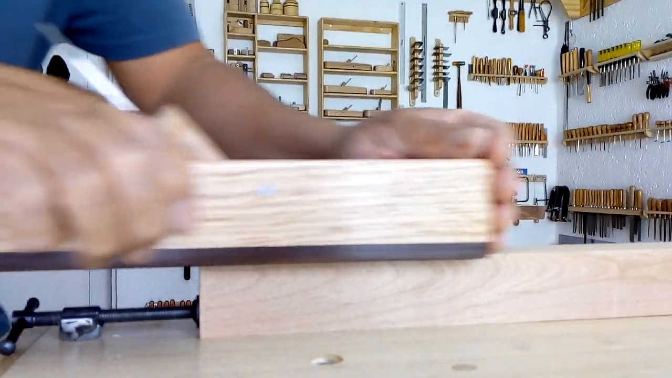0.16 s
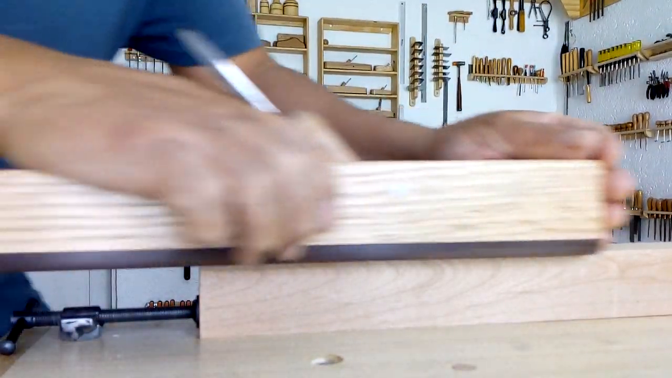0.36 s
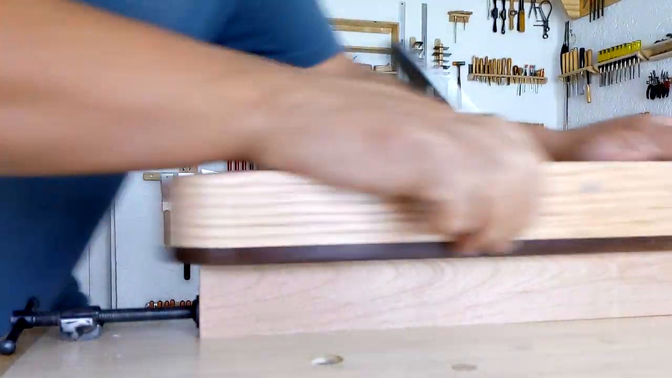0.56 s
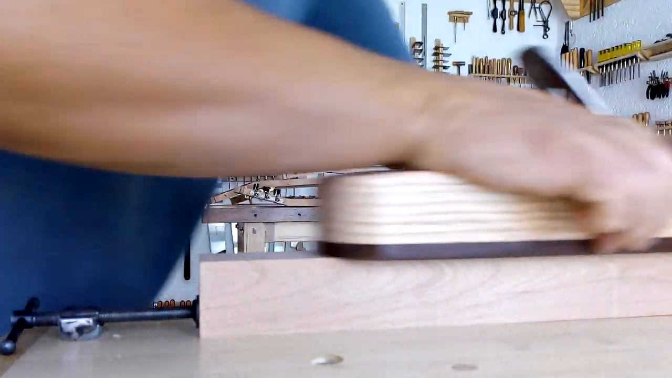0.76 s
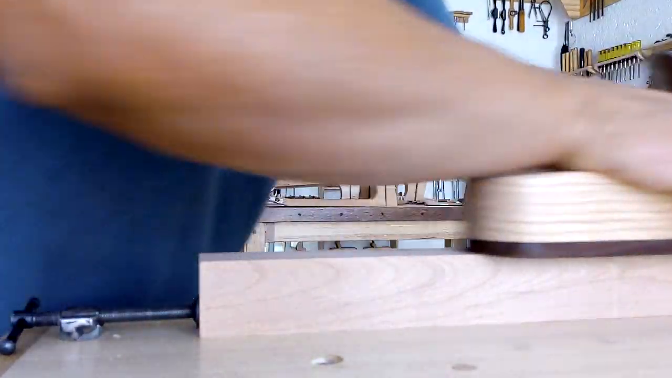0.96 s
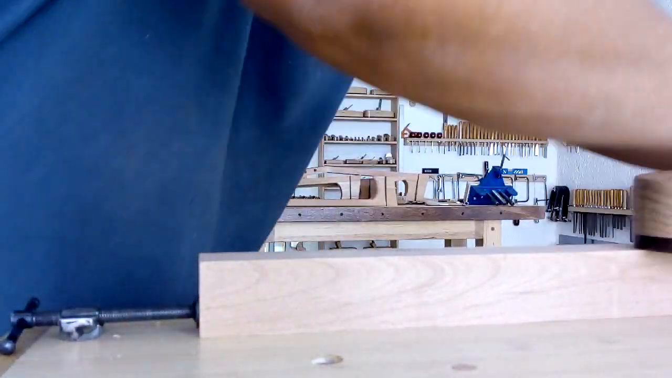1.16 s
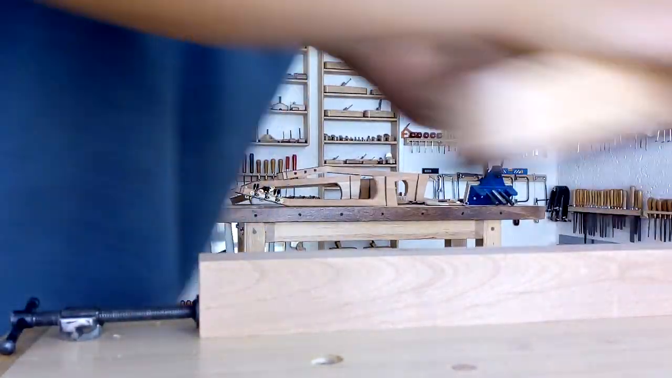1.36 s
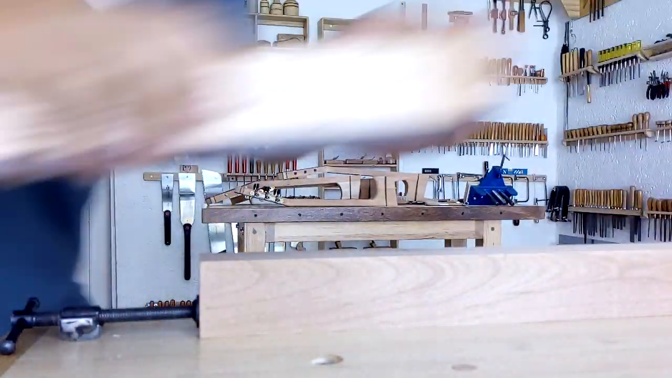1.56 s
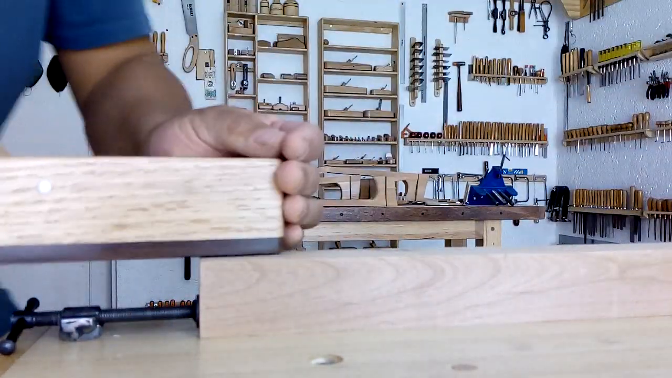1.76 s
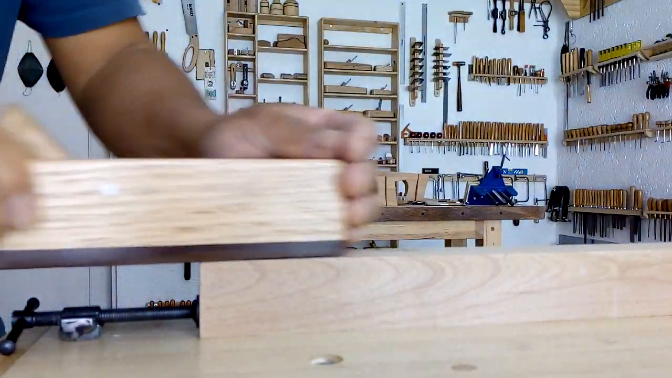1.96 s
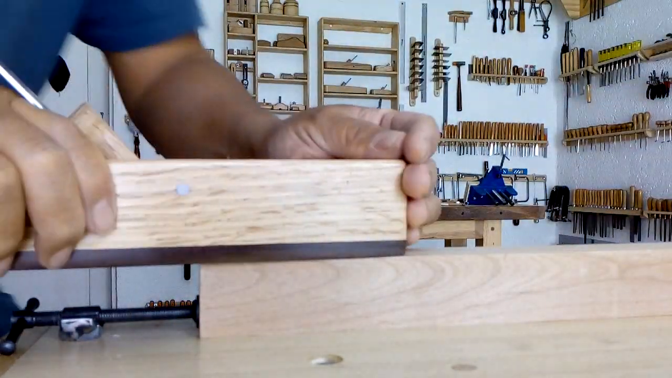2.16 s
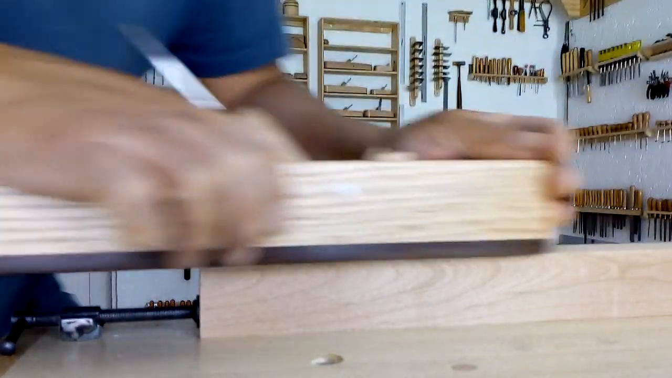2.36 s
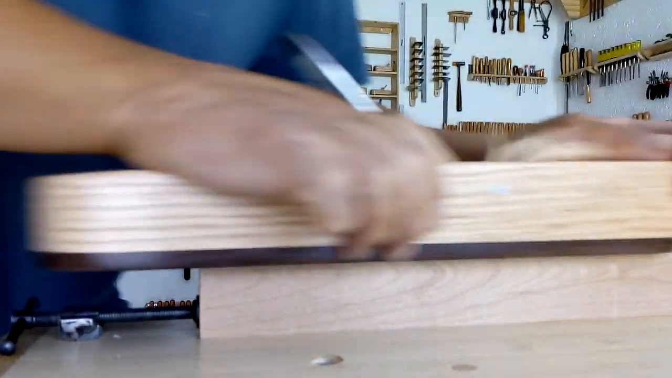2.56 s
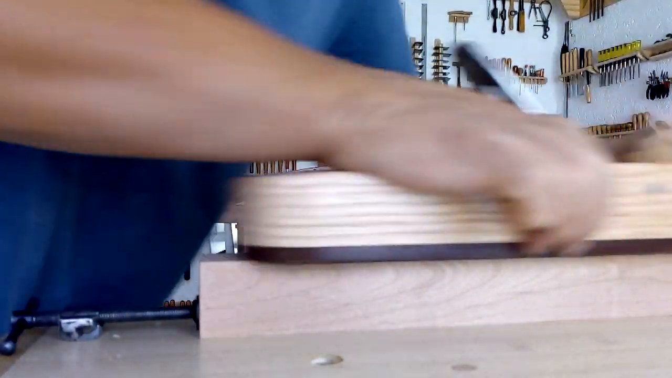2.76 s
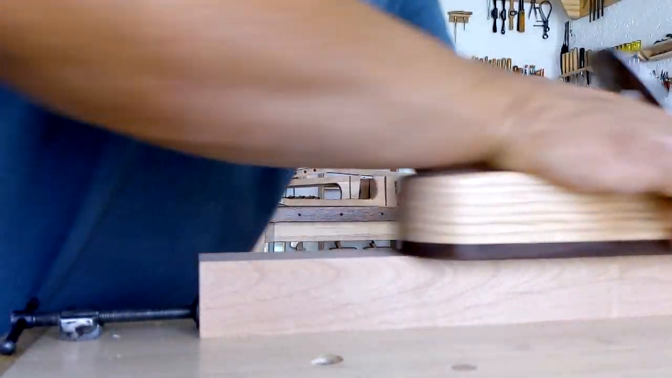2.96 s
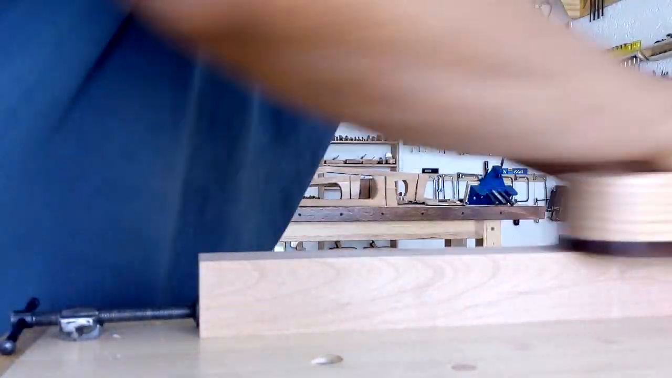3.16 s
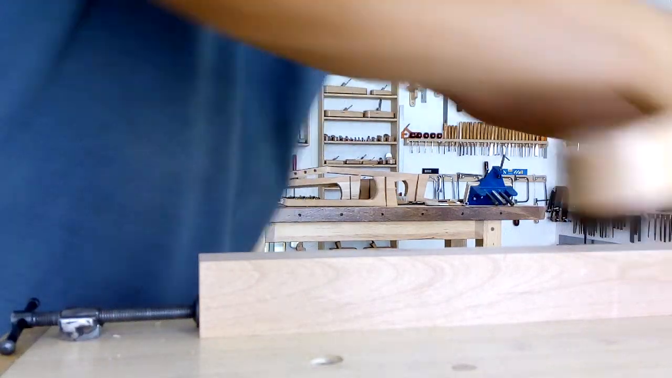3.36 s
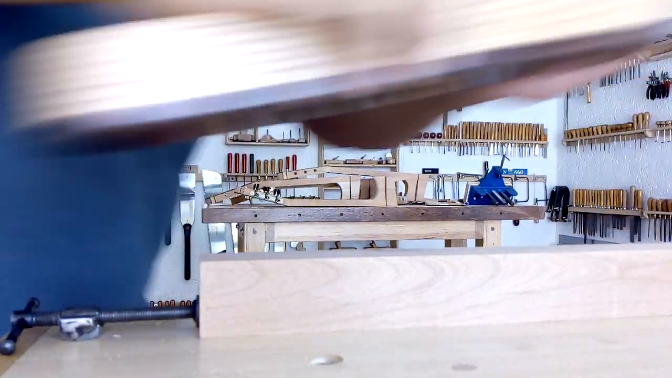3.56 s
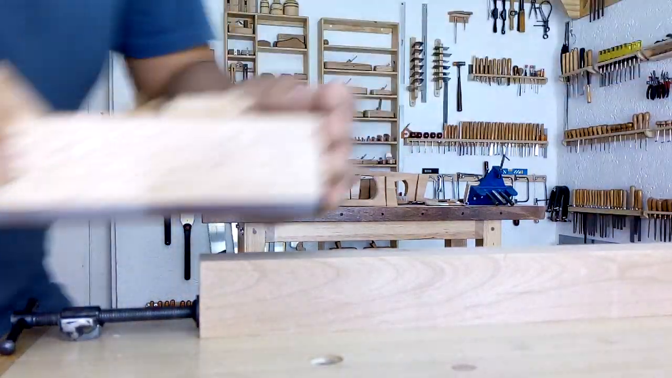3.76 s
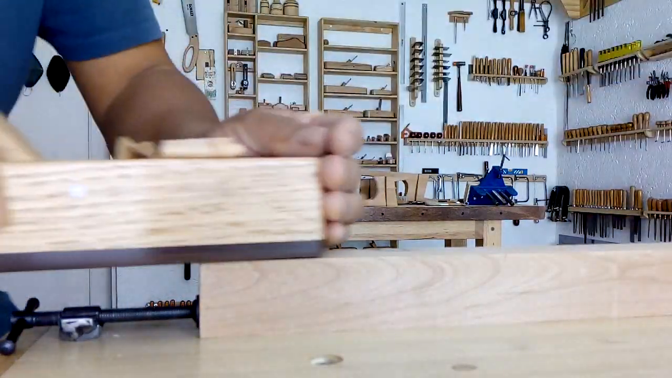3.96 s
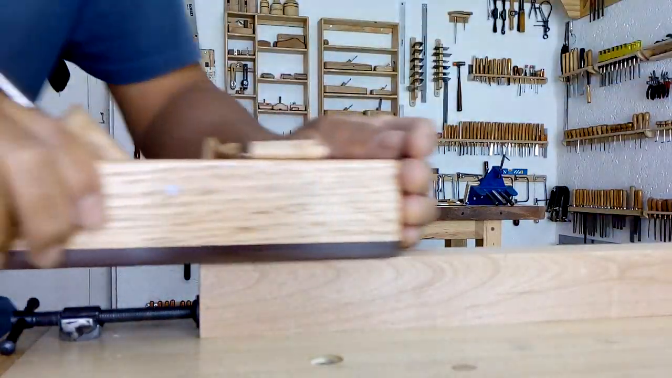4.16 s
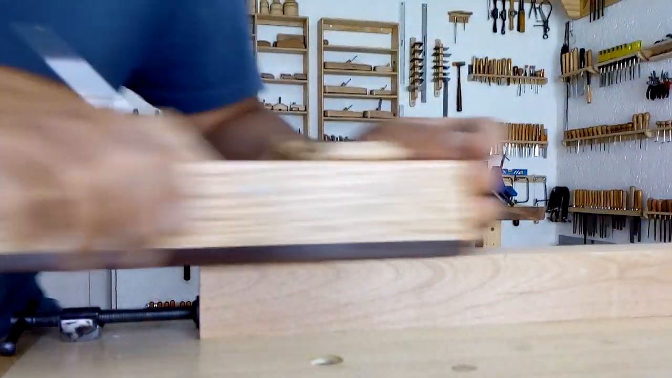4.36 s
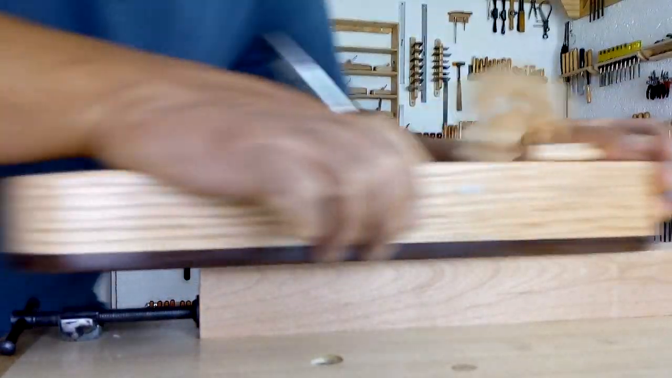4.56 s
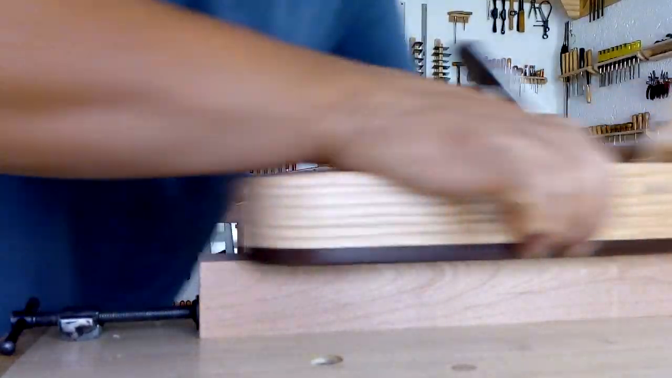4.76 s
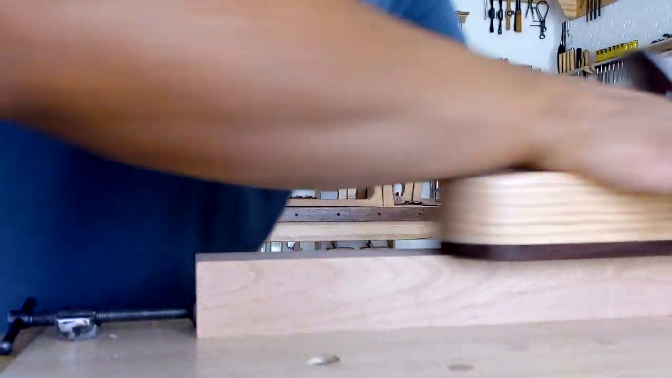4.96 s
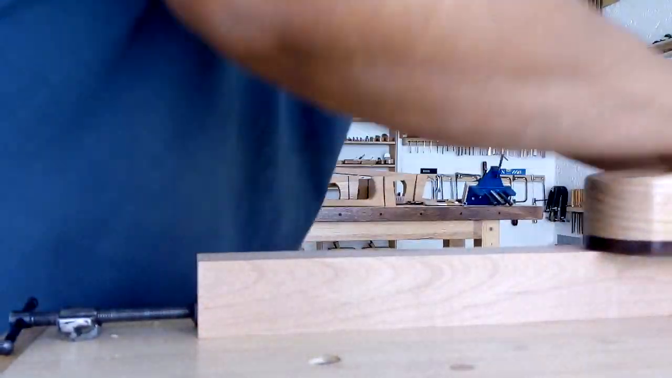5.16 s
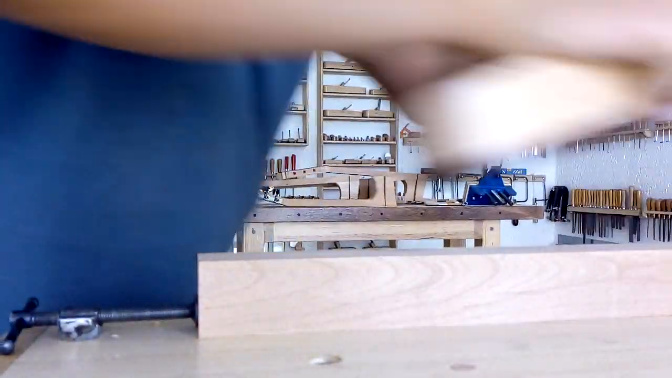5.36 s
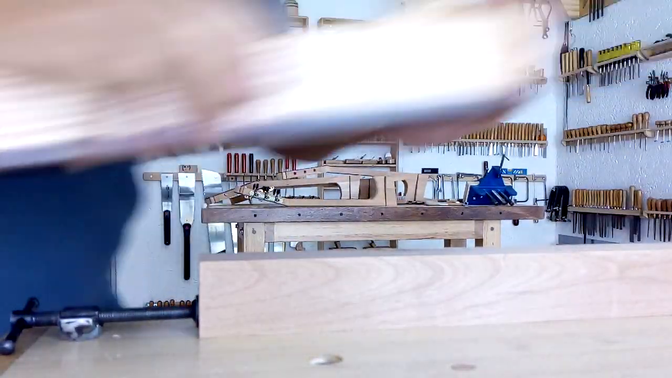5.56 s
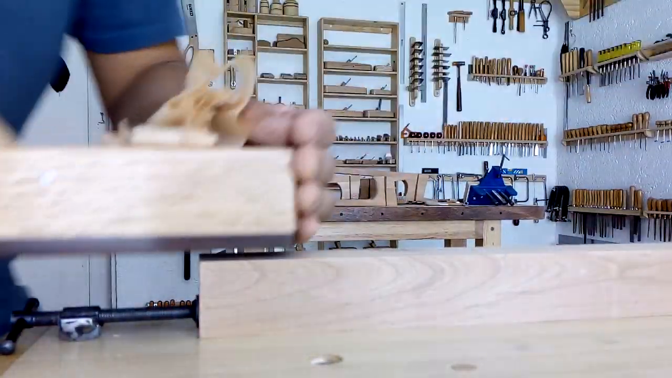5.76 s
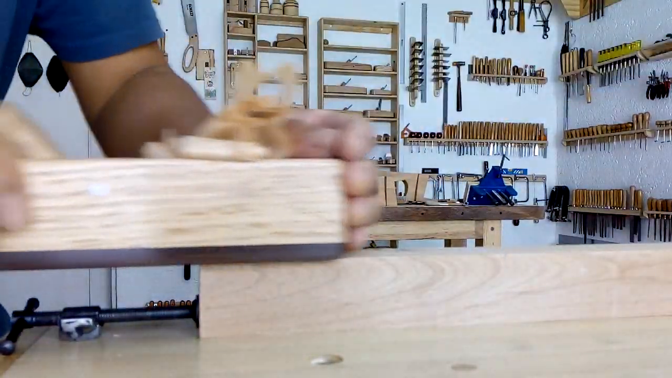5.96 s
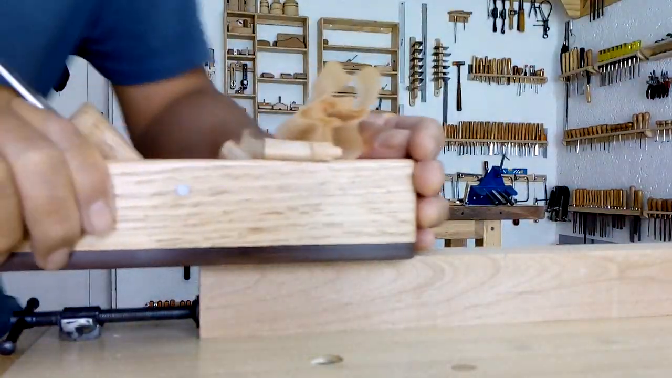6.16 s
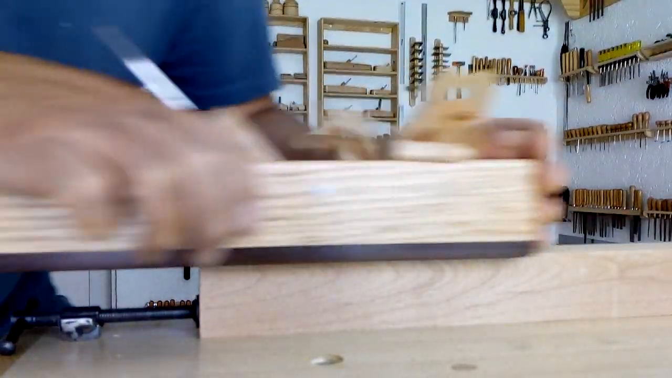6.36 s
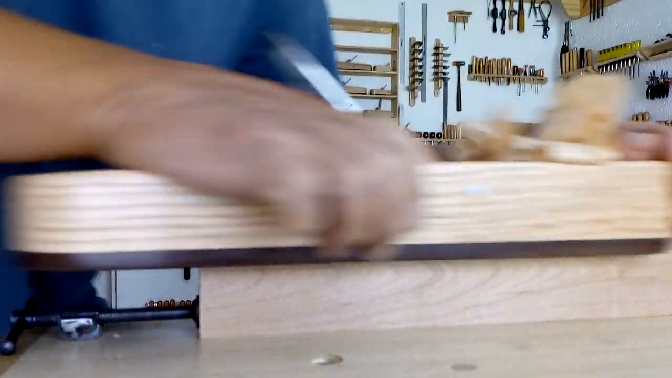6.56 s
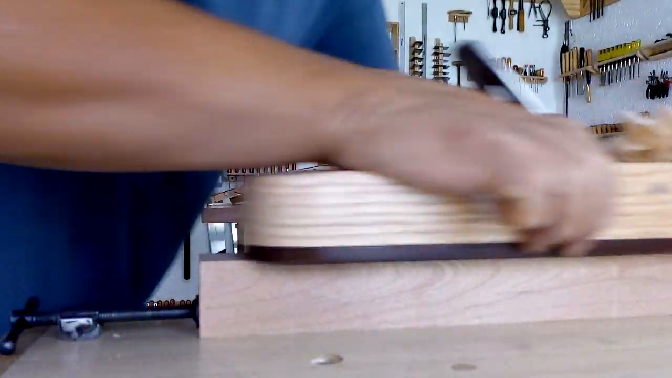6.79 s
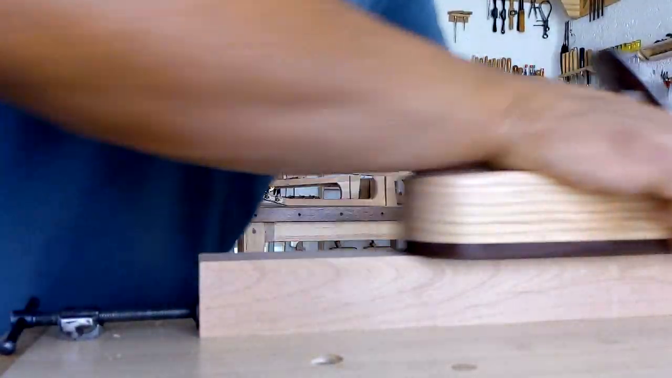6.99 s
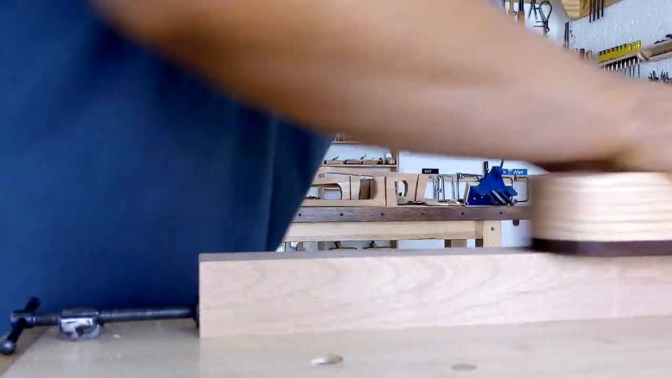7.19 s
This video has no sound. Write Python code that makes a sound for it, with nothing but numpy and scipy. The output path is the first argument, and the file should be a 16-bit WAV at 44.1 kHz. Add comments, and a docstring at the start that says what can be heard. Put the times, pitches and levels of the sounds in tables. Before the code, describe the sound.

A wooden hand plane is heard up close in a small workshop, louder on the right. It starts cutting at once, a grainy, hissing rasp with a wavering whistle, and ends with a knock at about 1 second. A faint low drone lingers briefly. At 1.8 seconds the plane is set down with a hollow, rocking knock, slides with faint squeaks and catches the board with a tick. The second stroke runs from 2.2 to 3.1 seconds. The plane knocks down again near 4 seconds, bites, and shaves from 4.3 to 5.1 seconds. After a short pause it lands at about 5.9 seconds, catches with a sharp crunch, and makes a last whistling stroke from 6.2 to 7.2 seconds. The workbench rumbles and shudders softly under each cut, and a faint low hum and quiet room air fill the gaps.

```python
"""A small workshop: a long wooden hand plane takes four shavings off the edge of a board clamped to a bench.
Between strokes it is set down with a hollow knock, rocks, and slides until the iron catches the board.
The cut is a stream of tiny fibre fractures that ring in the plane, hiss in the shaving and rub under
the sole. Beneath it lie the shuddering bench, a faint hum and the air of the room.
A close pair of microphones hears it, louder on the right."""
import sys
import numpy as np
from scipy import signal
from scipy.fft import rfft, irfft
from scipy.io import wavfile
from scipy.ndimage import uniform_filter1d

SR = 44100
rng = np.random.default_rng(int(sys.argv[2]) if len(sys.argv) > 2 else 0)


def output_pcm(signal):
    """Save a mono or channel-first signal as 16-bit PCM at the path in sys.argv[1].

    Samples are clipped to [-1, 1] before scaling.
    """
    pcm = np.clip(np.atleast_2d(signal).T, -1, 1) * 32767
    wavfile.write(sys.argv[1], SR, np.round(pcm).astype(np.int16))


N = 318843
TIME, FREQS = np.arange(N) / SR, np.fft.rfftfreq(N, 1 / SR)


def gain(db):
    """Decibels to gain."""
    return 10 ** (np.asarray(db) / 20)


def unit_rms(x):
    """Scales to rms 1."""
    return x / np.sqrt(np.mean(x ** 2) + 1e-20)


def curve_at(points, hz):
    """Reads a curve on a log-frequency axis."""
    freqs, values = np.transpose(points)
    return np.interp(np.log(hz + 1), np.log(freqs + 1), values)


def add(mix, start_s, sound):
    """Drops a sound into the mix."""
    part = mix[max(round(start_s * SR), 0):][:len(sound)]
    part += sound[:len(part)]


def envelope(cues, attack_s, release_s):
    """Gain over time for cues that rise, hold for their length and die away."""
    return sum(gain(db) * np.clip((TIME - start) / attack_s, 0, 1)
               * np.exp(-np.maximum(TIME - start - length, 0) / release_s) for start, length, db in cues)


def wander(rate_hz):
    """Smooth random modulation of rms 1, up to a rate."""
    return unit_rms(irfft(rfft(rng.standard_normal(N)) / (1 + (FREQS / rate_hz) ** 4), N))


def colour(x, spectrum, peaks=()):
    """Causal EQ of unit energy: a broad spectrum with resonances on top."""
    hz = np.fft.rfftfreq(8192, 1 / SR)
    db = curve_at(spectrum, hz) + sum(rise / (1 + (2 * (hz - f) / width) ** 2) for f, width, rise in peaks)
    log_gain = np.log(gain(np.r_[db, db[-2:0:-1]]))
    taps = np.fft.ifft(np.exp(signal.hilbert(log_gain).conj())).real[:len(hz)]  # minimum phase
    return signal.oaconvolve(x, taps / np.linalg.norm(taps))[:N]


def noise(spectrum):
    """Coloured noise of rms 1."""
    return unit_rms(colour(rng.standard_normal(N), spectrum))


def resonate(x, hz, width_hz, stages=2):
    """Resonators in series that follow the pitch curve hz; the result has rms 1."""
    turn, pole = np.exp(2j * np.pi * np.cumsum(hz) / SR), np.exp(-np.pi * width_hz / SR)
    for _ in range(stages):
        x = 2 * (turn * signal.lfilter([1 - pole], [1, -pole], x / turn)).real
    return unit_rms(x)


def patchy(x, depth_db, bins=7):
    """Shifts the colour in patches about a kilohertz wide and some hundredths of a second long."""
    spectra = signal.stft(x, SR, nperseg=256)[2]
    patches = rng.standard_normal(spectra.shape)
    for _ in range(2):
        patches = uniform_filter1d(uniform_filter1d(patches, bins, axis=0), 2 * bins, axis=1)
    return signal.istft(spectra * gain(depth_db * unit_rms(patches)), SR, nperseg=256)[1][:N]


def crackle(per_s, spread_db):
    """Impulses of uneven size at random moments: fibres snapping or wood slipping."""
    size = gain(spread_db * np.minimum(rng.exponential(1, N), 5))
    return unit_rms(size * rng.choice([-1, 1], N) * (rng.random(N) < per_s / SR))


# How alike the room sounds left and right: freq_hz, correlation
ROOM_LIKENESS = [(100, 0.91), (350, 0.9), (700, 0.46), (1300, 0), (15000, 0.25)]
def diffuse(pair):
    """Makes two unrelated signals alike in the bass, as a room is at two close microphones."""
    shared, separate = rfft(pair)
    likeness = np.clip(curve_at(ROOM_LIKENESS, np.fft.rfftfreq(pair.shape[1], 1 / SR)), -1, 1)
    left = likeness * shared + np.sqrt(1 - likeness ** 2) * separate
    return irfft(np.array([left, shared]), pair.shape[1])


# Decay of the room tail: freq_hz, t60_s
ROOM_DECAY = [(100, 0.47), (350, 0.53), (1000, 0.5), (2200, 0.43), (5000, 0.4), (9000, 0.17), (15000, 0.24)]
# Tone of the room tail: freq_hz, level_db
ROOM_EQ = [(100, 3), (280, -2), (450, 1), (1000, 1.5), (3000, 0), (15000, -1)]
def echoes(early_db, tail_db, early_t60_s=0.016, build_cycles=3.9):
    """Quick echoes off bench and body, then the room tail, for one position of the plane."""
    t = np.arange(SR) / SR
    taps = diffuse(rng.choice([-1., 1.], (2, SR)) * (rng.random((2, SR)) < 4000 / SR))
    early = taps[:, ::-1] * (t > .002) * gain(-60 * t / early_t60_s)
    hz, age, spectra = signal.stft(taps * (t > .009), SR, nperseg=256)
    build = 1 - np.exp(-(age * np.maximum(hz, 100)[:, None] / build_cycles) ** 2)  # the bass blooms late
    decay = gain(curve_at(ROOM_EQ, hz)[:, None] - 60 * age / curve_at(ROOM_DECAY, hz)[:, None])
    tail = signal.istft(spectra * build * decay, SR, nperseg=256)[1][:, :SR]
    return gain(early_db) * early / np.linalg.norm(early[1]) + gain(tail_db) * tail / np.linalg.norm(tail[1])


# Phase between the microphones: freq_hz, left_lead_rad
MIC_PHASE = [(100, 1), (1700, 1.03), (2150, -2), (2650, -2.5), (3000, 2.5), (3700, 3.5), (4500, -3),
             (6800, -2), (9000, 3), (16000, 1.5)]
def workshop(x, early_db, tail_db, turns_per_s=2.3):
    """Direct sound at both microphones, plus two echo patterns that crossfade as the plane travels."""
    left = irfft(rfft(x) * np.exp(1j * curve_at(MIC_PHASE, FREQS)), N)
    angle = 2 * np.pi * turns_per_s * TIME
    room = sum(signal.fftconvolve((x * share)[None], echoes(early_db, tail_db), axes=1)[:, :N]
               for share in (np.cos(angle), np.sin(angle)))
    return np.array([left, x]) + room


# Room tone: freq_hz, level_db
AIR_EQ = [(15, -47), (25, -21), (104, -14.5), (173, -25.5), (349, -17.5), (410, -27), (552, -23.5),
          (895, -29.5), (1080, -29.5), (1200, -29.5), (1660, -31.5), (1950, -27.5), (2770, -34.5),
          (15500, -58)]
# Fader ride on its hiss: time_s, level_db
AIR_SWELL = [(1.6, -9), (2.3, 0), (3.6, -2), (5.5, -5.5), (7.2, 3.5)]
def air(level_db=-59, crossover_hz=300):
    """Steady room rumble under a faint hiss that swells and sinks."""
    bed = diffuse(np.array([noise(AIR_EQ), noise(AIR_EQ)]))
    rumble = signal.sosfiltfilt(signal.butter(2, crossover_hz, fs=SR, output="sos"), bed)
    hiss = (bed - rumble) * gain(np.interp(TIME, *np.transpose(AIR_SWELL)))
    return gain(level_db) * (rumble + hiss)


# Fader ride on the hum: time_s, level_db
HUM_LEVEL = [(0.3, -69.5), (1.7, -69), (2.3, -68), (4.0, -61.5), (6.0, -61.5), (7.2, -61)]
def hum(pitch_hz=104, waver=0.0327, flutter_db=3):
    """One low tone that wavers in level and pitch."""
    flutter = gain(flutter_db * wander(4.7))
    tone = np.sin(2 * np.pi * pitch_hz * np.cumsum(1 + waver * wander(11)) / SR)
    return gain(np.interp(TIME, *np.transpose(HUM_LEVEL))) * unit_rms(flutter * tone)


# Drone cues: start_s, length_s, level_db
DRONE_CUES = [(0.0, 0.048, -47), (1.12, 0.37, -53)]
# Its partials: pitch_hz, level_db
DRONE_PARTIALS = [(150, 5.5), (204, -2.5), (250, -4), (303, -6.5), (346, -6.5)]
def drone(waver=0.0094, flutter_db=2):
    """A low drone of unsteady partials comes and goes around the first stroke."""
    chord = sum(gain(db + flutter_db * wander(31))
                * np.sin(2 * np.pi * hz * np.cumsum(1 + waver * wander(15)) / SR)
                for hz, db in DRONE_PARTIALS)
    return envelope(DRONE_CUES, attack_s=0.0079, release_s=0.13) * unit_rms(chord)


# Rustle cue: start_s, length_s, level_db
RUSTLE_CUES = [(1.6, 0.16, -62.5)]
# Its muffled tone: freq_hz, level_db
RUSTLE_EQ = [(120, -19), (320, 11.5), (800, -7), (1600, -27), (6000, -46.5)]
def rustle():
    """A faint rustle as the plane is carried back."""
    return envelope(RUSTLE_CUES, attack_s=0.04, release_s=0.04) * noise(RUSTLE_EQ)


# Shudders of the bench: start_s, length_s, level_db
SHUDDER_CUES = [(1.03, 0.04, -43), (2.5, 0.13, -40.5), (3.15, 0.054, -43), (4.22, 0.17, -35),
                (4.54, 0.28, -40.5), (5.08, 0.056, -33.5), (6.17, 0.09, -38), (6.52, 0.22, -45)]
# Its boomy low end: freq_hz, level_db
BENCH_EQ = [(40, 0), (82, -14), (105, 27.5), (128, -12), (152, 24.5), (185, -10.5), (235, 17.5),
            (350, -44.5)]
def bench(push_db=-63, trim_db=-10.5):
    """The bench rumbles under each stroke and shudders when the push changes."""
    pushes = [(path[0][0], path[-1][0] - path[0][0], push_db) for path in STROKE_PATHS]
    return gain(trim_db) * envelope(SHUDDER_CUES + pushes, attack_s=0.019, release_s=0.05) * noise(BENCH_EQ)


# Light slides before the iron bites: start_s, length_s, level_db
GLIDE_CUES = [(1.89, 0.046, -65), (1.985, 0.11, -60.5), (4.1, 0.14, -68), (5.99, 0.055, -72)]
# Squeaks of the sole: start_s, length_s, level_db
SQUEAK_CUES = [(1.795, 0.012, -61.5), (1.9, 0.047, -58), (2.0, 0.11, -63), (6.0, 0.06, -71)]
# Resonances they ring: pitch_hz, width_hz, level_db
SOLE_MODES = [(2420, 140, 4.5), (3520, 140, -1), (4920, 180, -8), (5830, 160, 1)]
def glide(drift=0.007, drift_hz=10):
    """Smooth wood on wood sticks and slips: thin squeaks in the sole, over a whisper."""
    slips = crackle(per_s=3000, spread_db=-0.5)
    sway = 1 + drift * wander(drift_hz)
    level = envelope(SQUEAK_CUES, attack_s=0.0084, release_s=0.018)
    active, squeaks = level > gain(-100), np.zeros(N)
    squeaks[active] = unit_rms(sum(gain(db) * resonate(slips[active], hz * sway[active], width)
                                   for hz, width, db in SOLE_MODES))
    whisper = unit_rms(colour(slips, [(1000, 10), (2400, 7), (6500, -2.0), (12000, -29)]))
    whisper *= envelope(GLIDE_CUES, attack_s=0.02, release_s=0.022)
    return patchy(level * squeaks + whisper, depth_db=3)


# Thuds of the sole: start_s, level_db, pitch_hz
THUD_HITS = [(1.889, -31, 324), (4.084, -23, 300), (6.0035, -24.5, 329)]
def thuds(trim_db=2, decay_s=0.0016):
    """The sole settles flat under the hand with a damped thud."""
    t, out = np.arange(SR // 2) / SR, np.zeros(N)
    swell = (t / decay_s / 2) ** 2 * np.exp(2 - t / decay_s)
    for start, db, hz in THUD_HITS:
        add(out, start, gain(trim_db + db) * swell * np.sin(2 * np.pi * hz * t))
    return out


# The plane lands, rocks, butts the board or tips; its lowest mode depends on how it rests:
# start_s, level_db, contact_s, low_mode_hz, low_mode_t60_s, click_db
KNOCK_HITS = [(1.055, -20.5, 0.0061, 249.5, 0.25, -70), (1.7885, -35, 0.0017, 272, 0.08, -68),
              (1.7981, -15, 0.001, 278, 0.053, -31.5), (1.809, -21.5, 0.0018, 280, 0.06, -48),
              (1.8174, -26, 0.00089, 264, 0.04, -52), (1.8254, -34, 0.0012, 278, 0.04, -60),
              (3.95, -24, 0.0025, 250, 0.1, -68), (3.9572, -13, 0.0018, 238, 0.35, -35.5),
              (3.9788, -27.5, 0.0026, 238, 0.24, -65), (4.008, -27.5, 0.0041, 241, 0.2, -71),
              (4.026, -26, 0.0054, 236, 0.1, -73), (4.231, -28, 0.0014, 384, 0.24, -55),
              (5.848, -45, 0.0014, 246, 0.1, -78), (5.852, -15.5, 0.0014, 273, 0.16, -38),
              (5.867, -24, 0.0035, 242, 0.15, -72), (5.88, -20, 0.0049, 240, 0.15, -66),
              (5.897, -22, 0.0024, 233, 0.15, -74), (5.946, -31, 0.0023, 247, 0.05, -67),
              (6.148, -41, 0.0012, 380, 0.05, -62), (6.169, -26.5, 0.0011, 385, 0.22, -60)]
# Modes of the plane lying on the board: pitch_hz, level_db, t60_s
BODY_MODES = [(293, 3.5, 0.018), (340.3, -12.5, 0.33), (432, -23, 0.08), (515, -12.5, 0.096),
              (566, -25.5, 0.28), (651, -22, 0.2), (738, -21.5, 0.06), (811.5, -10, 0.083),
              (899, -5.5, 0.052), (953, -15, 0.11), (981, -28, 0.4), (1100, -11.5, 0.071),
              (1225, -3, 0.031), (1450, -6, 0.03), (1740, -16, 0.041), (2387, -10.5, 0.049)]
# Tone of the contact click: freq_hz, level_db
CLICK_EQ = [(300, -3), (1200, 19), (2300, 6.5), (3200, -14), (6000, -5), (9000, -35), (15500, -27)]
def knocks(trim_db=3, low_mode_db=-11, rise_cycles=0.37, click_t60_s=0.016):
    """Wood on wood rings the hollow body; a dry click marks each contact, and thuds join in."""
    t, out, clicks = np.arange(SR // 2) / SR, thuds(), np.zeros(N)

    def mode(hz, db, t60):
        """One mode swells within a cycle and dies away."""
        return gain(db - 60 * t / t60) * (1 - np.exp(-hz * t / rise_cycles)) * np.cos(2 * np.pi * hz * t)

    body = sum(mode(*row) for row in BODY_MODES)
    for start, db, contact_s, low_hz, low_t60, click_db in KNOCK_HITS:
        push = t ** 2 * np.exp(-3 * np.pi * t / contact_s)  # a shorter contact is brighter
        ring = signal.fftconvolve(push / push.sum(), body + mode(low_hz, low_mode_db, low_t60))[:len(t)]
        add(out, start, gain(db + trim_db) * ring)
        add(clicks, start, gain(click_db - 60 * t / click_t60_s))
    out += colour(clicks * rng.standard_normal(N), CLICK_EQ)
    # the knocks carry almost nothing below about 185 Hz
    return signal.sosfilt(signal.butter(3, 185, "highpass", fs=SR, output="sos"), out)


# Peaks and dips of iron, wedge and stock: freq_hz, width_hz, boost_db
PLANE_RESONANCES = [(394, 34, 6.5), (710, 110, 3.5), (889, 53, 5), (1000, 280, 0), (1383, 99, 7),
                    (1662, 158, 13), (2010, 160, -6.5), (2130, 170, 3.5), (2320, 120, 2.5),
                    (2610, 120, 4.5), (2760, 200, -4), (3613, 270, 5.5), (4580, 150, 4), (6120, 320, -2.5)]
def through_plane(x, spectrum):
    """Shapes a sound with a broad EQ and the resonances of the cutting plane."""
    return colour(x, spectrum, PLANE_RESONANCES)


# The iron catches the wood: start_s, level_db, decay_s, tick_db
CATCH_HITS = [(2.135, -38, 0.0077, -30.5), (2.251, -31, 0.013, -59), (4.23, -25, 0.0068, -31),
              (4.405, -31, 0.0035, -51), (4.503, -46, 0.0082, -27), (6.167, -16.5, 0.0059, -26.5),
              (6.846, -40, 0.0022, -36), (6.911, -33, 0.0032, -37.5)]
# Tone of the crunch: freq_hz, level_db
CRUNCH_EQ = [(80, -16), (350, 10), (560, 7), (900, 19), (1700, 10), (2400, 12.5), (2900, -28), (4600, -8),
             (7000, -31), (11000, -37), (15500, -20)]
# Tone of the tick: freq_hz, level_db
TICK_EQ = [(1000, -15), (2300, 2.5), (3500, 2.5), (4600, 0), (5500, -2.5), (8000, -4.5), (12000, -22),
           (15500, -4)]
def catches(crunch_trim_db=-8, tick_trim_db=-6, tick_s=0.00053):
    """A short burst of breaking fibres rings the iron, with a bright tick at the edge."""
    t, bursts, ticks = np.arange(SR // 8) / SR, np.zeros(N), np.zeros(N)
    for start, db, decay_s, tick_db in CATCH_HITS:
        add(bursts, start, gain(db + crunch_trim_db) * np.exp(-t / decay_s))
        add(ticks, start, gain(tick_db + tick_trim_db) * np.exp(-t / tick_s))
    crunch = through_plane(bursts * rng.standard_normal(N), CRUNCH_EQ)
    return crunch + through_plane(ticks * rng.standard_normal(N), TICK_EQ)


# Groans at the bite, whistles at speed: start_s, length_s, from_hz, to_hz, width_hz, level_db
WHISTLE_CUES = [(0.055, 0.26, 2180, 2360, 327, -37.5), (0.757, 0.24, 4160, 4570, 330, -43.5),
                (0.766, 0.14, 2550, 2400, 261, -40), (1.941, 0.054, 2390, 2770, 110, -65),
                (2.245, 0.026, 760, 910, 302, -39), (2.263, 0.085, 2210, 2400, 240, -29.5),
                (2.597, 0.42, 2505, 2650, 240, -38), (4.33, 0.037, 700, 950, 300, -39),
                (4.353, 0.034, 1620, 1730, 160, -41.5), (4.376, 0.05, 2110, 2390, 260, -26.5),
                (4.694, 0.18, 4060, 4300, 400, -48), (6.413, 0.15, 1675, 1775, 150, -40),
                (6.763, 0.098, 3630, 3590, 110, -36), (6.77, 0.31, 2645, 2555, 200, -30.5)]
def whistles(grain_hz=90, grain_db=-2.0):
    """Fractures lock iron or sole into one sharp resonance that swells, glides and fades."""
    fractures = crackle(per_s=9000, spread_db=3.5) * gain(grain_db * wander(grain_hz))
    out = np.zeros(N)
    for start, length, from_hz, to_hz, width, db in WHISTLE_CUES:
        progress = np.arange(0, 1, 1 / (length * SR))
        hz = from_hz + (to_hz - from_hz) * progress
        tone = resonate(fractures[round(start * SR):][:len(hz)], hz, width)
        swell = abs(np.sin(np.pi * progress)) ** 0.6
        add(out, start, gain(db) * unit_rms(swell * tone))
    return out


def stroke(textures, path, fold, fold_hz, curl_hz, curl_db, note_share):
    """One pass: the iron bites, the shaving folds over, the plane speeds up, slows and runs off."""
    attack_s, fold_s, exit_s = 0.0036, 0.04, 0.0099
    curl_start_hz, iron_note_hz, note_lead_s = 3080, 2043, 0.26
    start, end = path[0][0], path[-1][0]
    active = (TIME >= start) & (TIME < end + .5)
    t = TIME[active]
    mouth, sing, bend, hiss, fizz, rub, grain = textures[:, active]
    times, *lanes = np.transpose(path)
    ring_hz, ring_db, hiss_db, fizz_db, rub_db = (np.interp(t, times, lane) for lane in lanes)
    stray = 1 + 0.029 * grain  # uneven grain pulls the resonances about
    # along the board the rough ring of the mouth gives way to one clear resonance
    purity = np.interp(t, [start, fold, end], [0.24, 0.32, 1])
    rough = resonate(mouth, ring_hz * stray, width_hz=400, stages=1)
    clear = resonate(sing, ring_hz * stray, width_hz=800)
    ring = np.sqrt(1 - purity) * rough + np.sqrt(purity) * clear
    # as the plane leaves, the ring narrows to the iron's own note
    note_mix = np.interp(t, [end - note_lead_s, end, end + exit_s], [0, note_share, 1])
    note = resonate(hiss, np.full(len(t), iron_note_hz), width_hz=320)
    ring = np.sqrt(1 - note_mix) * ring + np.sqrt(note_mix) * note
    # the young shaving whistles upward until it folds
    whistle_hz = np.interp(t, [start, fold, fold + fold_s], [curl_start_hz, fold_hz, curl_hz])
    curl = resonate(bend, np.sqrt(stray) * whistle_hz, width_hz=480)
    shaving = gain(hiss_db + 2) * unit_rms(hiss + gain(curl_db) * curl) + gain(fizz_db + 1.5) * fizz
    # off the board the cut drops at once, and each layer fades at its own rate in dB per second
    after_s = np.maximum(t - end, 0)
    exit_drop = gain(-5 * np.minimum(after_s / exit_s, 1))
    cutting = gain(ring_db + 0.82 - 142 * after_s) * ring + gain(-167 * after_s) * shaving
    rubbing = gain(rub_db + 0.5 - 191 * after_s) * rub
    return np.minimum((t - start) / attack_s, 1) * (exit_drop * cutting + rubbing)


# Automation for each stroke, from bite to exit; the ring rises with the speed of the plane:
# time_s, ring_hz, ring_db, hiss_db, fizz_db, rub_db
STROKE_PATHS = [
    [(0.01, 1520, -65, -65, -69, -53.5), (0.058, 1580, -46.5, -54, -56, -37.5),
     (0.086, 1560, -37, -56, -53, -34.5), (0.226, 1790, -33, -43, -50, -53.5),
     (0.296, 2290, -32, -46, -48, -44), (0.368, 2190, -33.5, -39, -49, -50.5),
     (0.438, 2110, -39.5, -44, -44.5, -44.5), (0.474, 2100, -44, -48, -49.5, -41.5),
     (0.542, 2280, -44.5, -47.5, -51, -45), (0.656, 1940, -45.5, -46, -48, -48),
     (0.772, 2290, -38.5, -43.5, -47, -46.5), (0.916, 2210, -33.5, -38.5, -48, -47.5),
     (1.004, 2240, -28.5, -39.5, -44.5, -42.5), (1.042, 2100, -31, -36.5, -51, -51.5),
     (1.06, 2050, -26.5, -41.5, -45, -42)],
    [(2.232, 1700, -50, -71.5, -57, -50), (2.254, 1800, -36.5, -45.5, -52, -45.5),
     (2.29, 2160, -27, -38.5, -40, -49.5), (2.416, 2540, -34.5, -35.5, -46, -50),
     (2.482, 1970, -36, -40.5, -39.5, -43.5), (2.512, 2500, -31.5, -46, -51, -41.5),
     (2.562, 2090, -31.5, -45, -52, -43.5), (2.646, 2620, -29.5, -41, -46.5, -47),
     (2.708, 2255, -33, -41, -44, -46.5), (2.77, 2520, -31, -39.5, -46.5, -46.5),
     (2.906, 2360, -32.5, -41.5, -45.5, -45), (3.004, 2230, -27, -41.5, -51, -46),
     (3.088, 2150, -26, -36, -48, -48.5), (3.138, 2060, -33, -45, -50.5, -46),
     (3.145, 2100, -30, -50, -56, -45)],
    [(4.33, 1770, -54, -64, -68, -46), (4.351, 2000, -36, -46, -59, -43),
     (4.389, 2190, -28, -37, -48, -52.5), (4.451, 2460, -42, -36, -44, -45.5),
     (4.481, 2650, -35, -34.5, -46, -48.5), (4.507, 2320, -40.5, -33, -34, -55),
     (4.531, 1970, -34.5, -35.5, -41.5, -38), (4.591, 2260, -36, -46.5, -48, -37),
     (4.641, 2340, -31.5, -38.5, -44, -44), (4.669, 2360, -34.5, -35.5, -44, -48),
     (4.775, 2840, -36.5, -33.5, -45.5, -48.5), (4.925, 2740, -32.5, -39.5, -44.5, -43.5),
     (4.977, 2470, -36, -36.5, -46, -47.5), (5.057, 2220, -33.5, -35.5, -42, -44.5),
     (5.098, 2240, -36, -54, -56.5, -47)],
    [(6.235, 1940, -43, -66, -68, -47), (6.285, 2210, -28, -41.5, -54.5, -39),
     (6.335, 2140, -31, -40.5, -47, -56), (6.401, 2340, -32, -43, -49.5, -46),
     (6.473, 2060, -33, -39, -48.5, -50.5), (6.559, 2300, -31, -43, -48.5, -41.5),
     (6.637, 2500, -32, -39.5, -48, -47), (6.761, 2450, -33, -36.5, -51, -53.5),
     (6.793, 2530, -29, -37, -49, -44), (6.811, 2500, -31.5, -46, -49.5, -46),
     (6.885, 2410, -27.5, -39, -47.5, -41.5), (6.907, 2540, -34, -46, -48, -50),
     (7.033, 2400, -30, -40.5, -49.5, -44.5), (7.127, 2250, -28.5, -40, -48.5, -46.5),
     (7.19, 1860, -31, -45, -52, -47)],
]
# One shaving a stroke: fold_time_s, pitch_at_fold_hz, pitch_after_hz, curl_over_hiss_db, iron_note_share
SHAVING_CURLS = [(0.46, 4340, 4300, -10.5, 0.36), (2.5, 4350, 4990, -11, 1), (4.539, 4200, 3300, -8, 0.24),
                 (6.53, 3640, 3560, -6, 0.03)]
# Modes of the iron that the ring sweeps through: pitch_hz, width_hz, boost_db
IRON_MODES = [(1640, 180, 3.5), (1940, 150, -4), (2140, 130, 2), (2360, 80, 3), (2590, 110, 4),
              (3050, 400, -1)]
# The sole drags hard on the wood: start_s, length_s, level_db
DRAG_CUES = [(1.96, 0.095, -58), (2.145, 0.047, -57.5), (4.235, 0.05, -43), (6.173, 0.066, -37)]
# Tone of the plane's mouth, the shaving's hiss and fizz, the sole's rub and drag: freq_hz, level_db
MOUTH_EQ = [(300, -55.5), (1100, 0.5), (1550, -4), (2150, 1), (2750, -3.5), (3200, -0.5), (6000, -15)]
HISS_EQ = [(800, -37.5), (2000, -8.5), (3000, 1.5), (4200, -3.5), (5200, -3), (6000, -2), (7500, -25.5),
           (10000, -44)]
FIZZ_EQ = [(3500, -36.5), (5200, -9), (6300, 1), (7500, -5), (8600, -1), (10000, -13), (12000, -21),
           (13500, -13), (15200, -5), (16500, -26)]
RUB_EQ = [(60, -46.5), (150, -5.5), (250, -0.5), (400, 0), (800, 3), (1200, 0.5), (1600, -8), (2200, -9),
          (4000, -41.5)]
DRAG_EQ = [(100, -16), (250, -7), (380, 6.5), (550, 2), (900, 3.5), (1400, -10.5), (1700, -10),
           (2200, -6.5), (2800, -22), (4600, -25.5), (7000, -42)]
def cut(chatter_db=0.05, chatter_hz=260, grain_db=-0.5, grain_hz=45, knots_db=0.5, knots_hz=11,
        judder_db=0.85, judder_hz=180, stray_rate_hz=23.95):
    """The iron chatters through uneven grain; fractures ring in the mouth, hiss in the shaving and rub."""
    bite = unit_rms(gain(chatter_db * wander(chatter_hz) + grain_db * wander(grain_hz)
                         + knots_db * wander(knots_hz)))
    mouth = through_plane(bite * crackle(per_s=8300, spread_db=3.5), MOUTH_EQ)
    bend = bite * crackle(per_s=8000, spread_db=3.5)
    snaps = bite * crackle(per_s=5500, spread_db=3.0)
    hiss = unit_rms(patchy(through_plane(snaps, HISS_EQ), depth_db=0.76))
    fizz = unit_rms(patchy(colour(snaps, FIZZ_EQ), depth_db=1.0))
    friction = bite * gain(judder_db * wander(judder_hz)) * crackle(per_s=6000, spread_db=2.5)
    rub = unit_rms(patchy(through_plane(friction, RUB_EQ), depth_db=0.5))
    sing = colour(bend, [(1, 0)], IRON_MODES)  # flat apart from the modes
    drag = unit_rms(through_plane(snaps, DRAG_EQ))
    textures = np.array([mouth, sing, bend, hiss, fizz, rub, wander(stray_rate_hz)])
    out = envelope(DRAG_CUES, attack_s=0.0066, release_s=0.019) * drag
    for path, shaving in zip(STROKE_PATHS, SHAVING_CURLS):
        add(out, path[0][0], stroke(textures, path, *shaving))
    return out


def scene():
    """The mix: the plane's layers, each with its own room send, over the bench and the background."""
    planing = gain(-3.5) * workshop(cut() + glide(), early_db=1, tail_db=-4.5)
    singing = workshop(whistles(), early_db=-8, tail_db=-8)
    landing = workshop(knocks(), early_db=-12, tail_db=-7.7)
    catching = workshop(catches(), early_db=0, tail_db=-5)
    return planing + singing + landing + catching + bench() + drone() + rustle() + air() + hum()


# Balance of the microphones: freq_hz, left_minus_right_db
MIC_BALANCE = [(100, -7), (400, -8), (1100, -6.5), (2100, -6), (2400, -5), (3500, -9), (4500, -3.5),
               (6300, -7), (9000, -3.5), (12000, -4), (15000, -17.5)]
def record(dry):
    """The left microphone is weaker than the right and duller at the very top; a low-pass ends the chain."""
    ratio = gain(curve_at(MIC_BALANCE, FREQS))
    heard = irfft(rfft(dry) * 2 * np.array([ratio, np.ones_like(ratio)]) / (1 + ratio), N)
    lowpass = signal.firwin(511, cutoff=15700, window=("kaiser", 9), fs=SR)
    return signal.oaconvolve(heard, lowpass[None], "same")


dry = scene()
out = record(dry)
output_pcm(out)
```